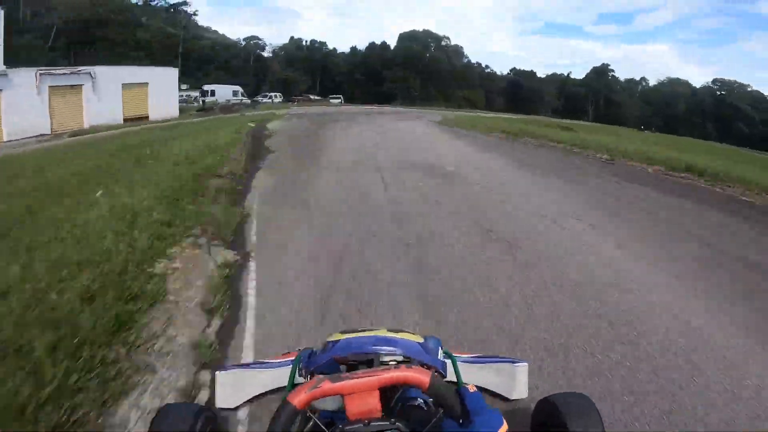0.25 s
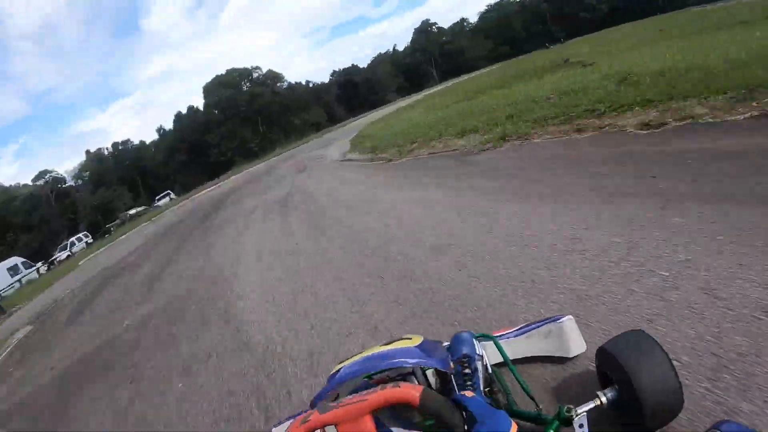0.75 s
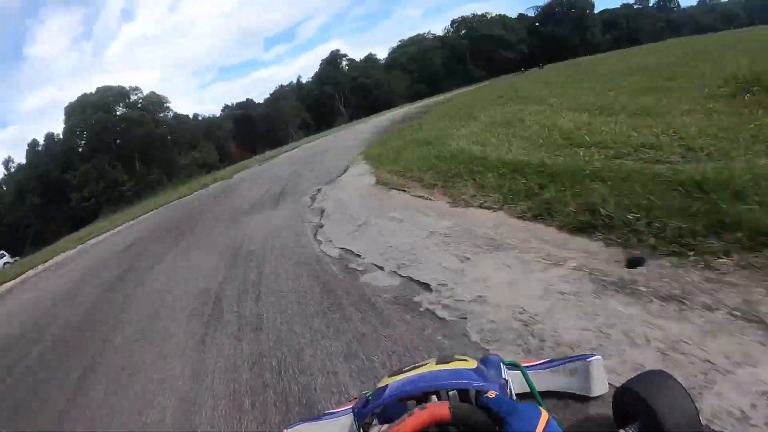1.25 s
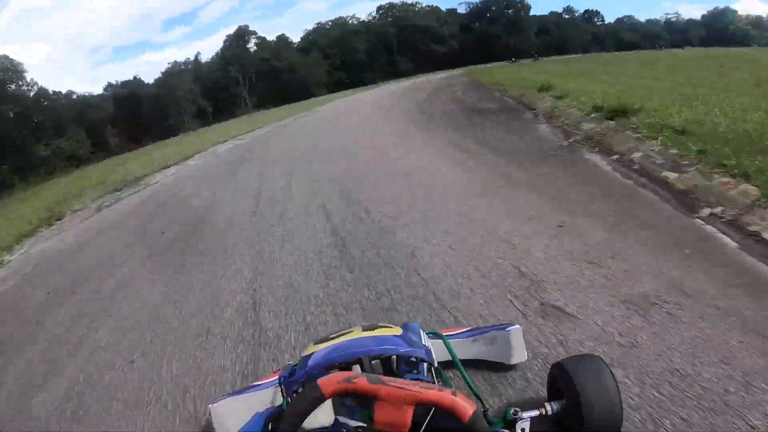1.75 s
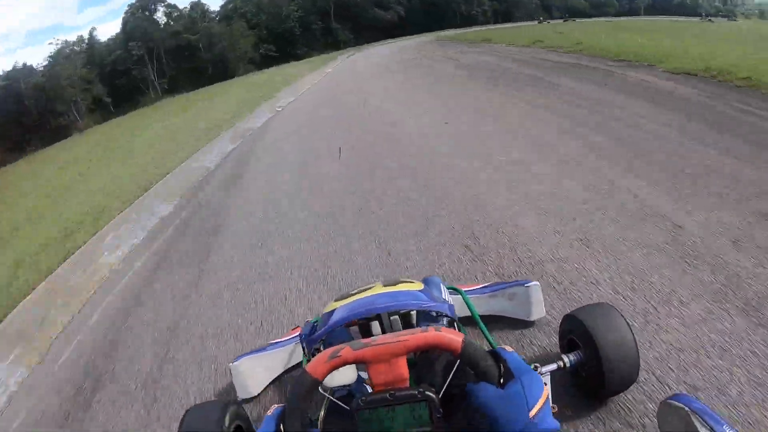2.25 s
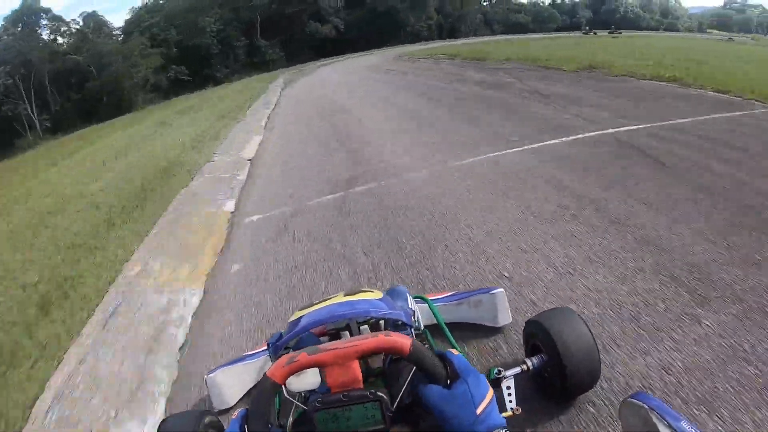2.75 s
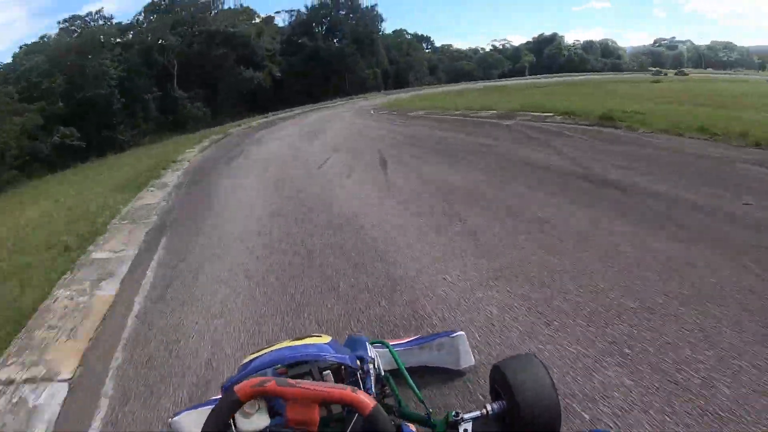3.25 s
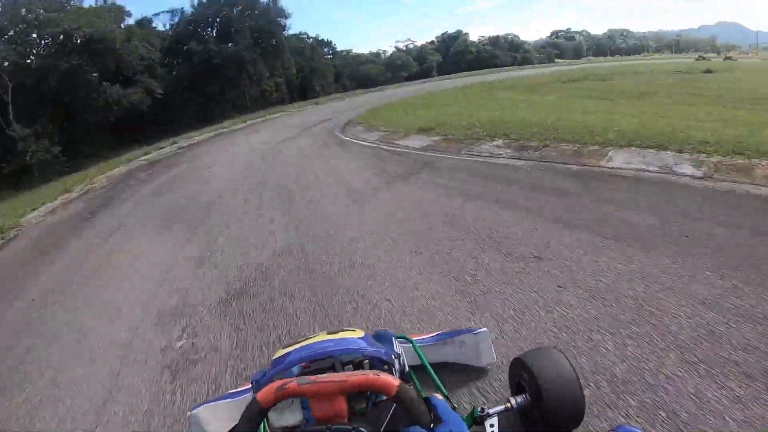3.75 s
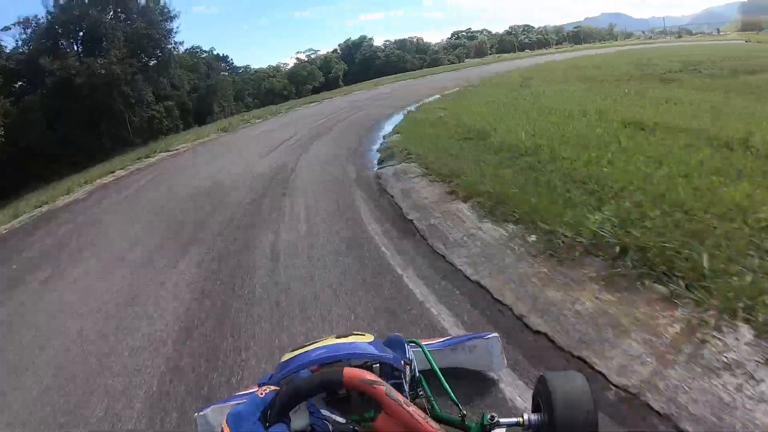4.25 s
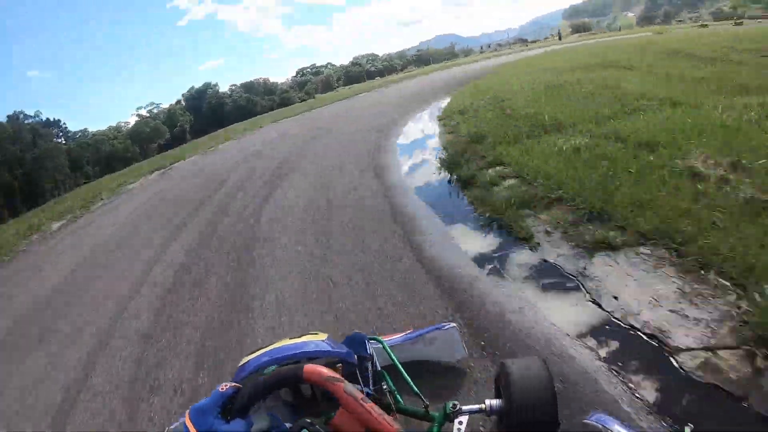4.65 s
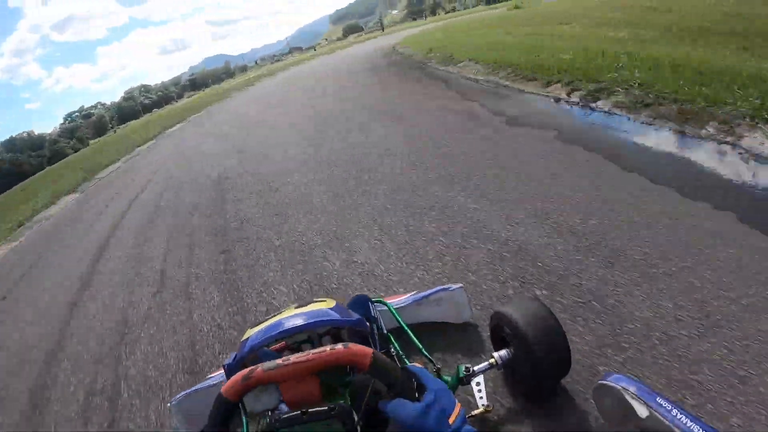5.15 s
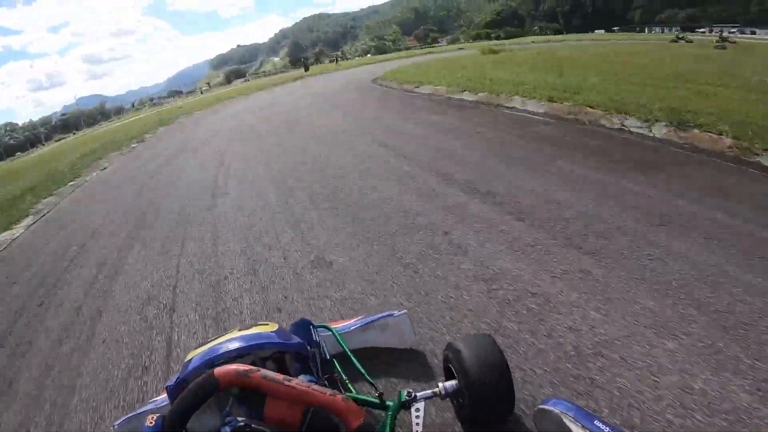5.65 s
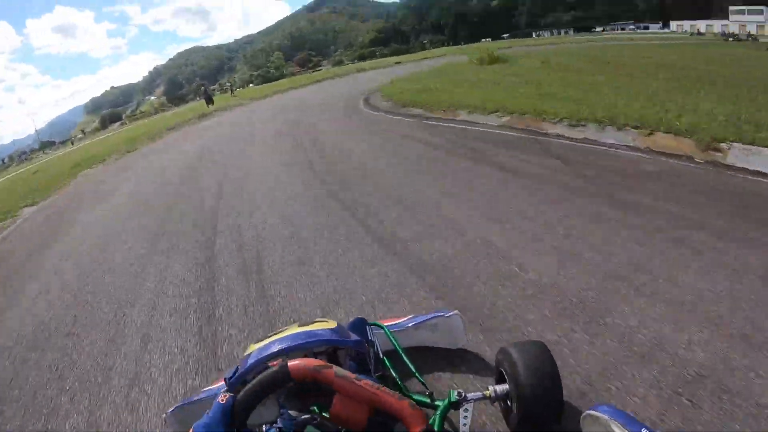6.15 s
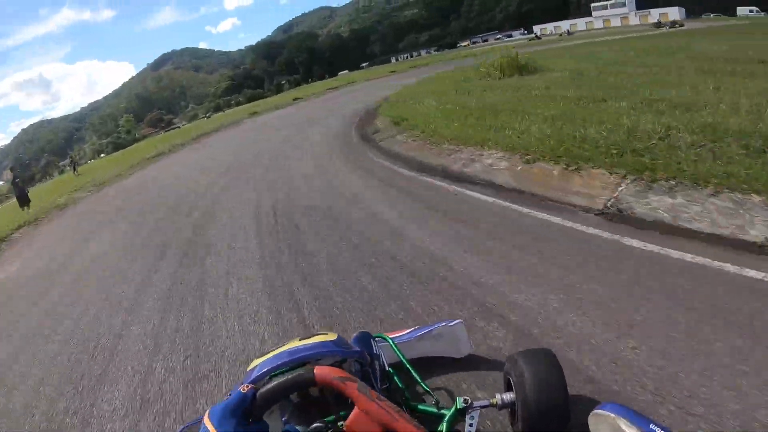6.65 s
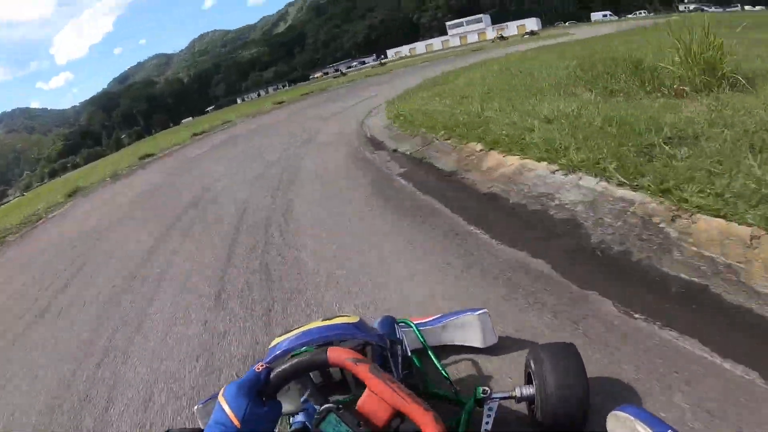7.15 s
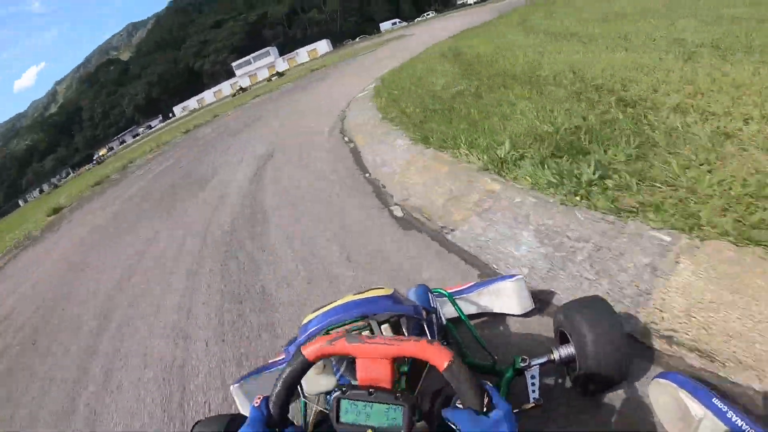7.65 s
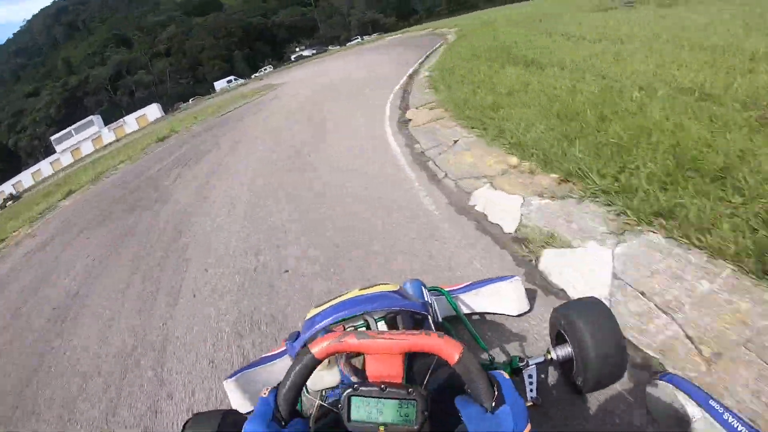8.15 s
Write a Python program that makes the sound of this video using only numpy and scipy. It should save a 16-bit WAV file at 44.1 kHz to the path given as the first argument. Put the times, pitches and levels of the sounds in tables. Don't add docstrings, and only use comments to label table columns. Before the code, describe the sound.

A helmet microphone sits close to a small single-cylinder four-stroke kart on an open track. It begins at full throttle, a fast, hard rasp with tyre roar and drumming wind, and briefly climbs in pitch before the driver lifts at about 0.5 seconds. From 0.8 to 1.1 seconds sharp backfires bang and pop, the sound ducking after the loudest, while rough ground rattles the bodywork and tyres scrub. A steady, gritty pull runs from 1.3 to 3.2 seconds. Revs then fall, with faint pops around 3.6 to 3.9 and a strong tyre scrub near 4.3. A rounder, slower pull fills 4.7 to 5.8 seconds, followed by coasting, brief throttle stabs and uneven firing as tyres slide, strongest from 7.1 to 7.7. From 7.7 the engine pulls again, low and throbbing, until the end at about 8.4.

```python
import sys
import numpy as np
from scipy import signal
from scipy.fft import rfft, irfft, next_fast_len
from scipy.io import wavfile
from scipy.ndimage import uniform_filter1d, map_coordinates

SR = 44100
rng = np.random.default_rng(int(sys.argv[2]) if len(sys.argv) > 2 else 0)


def master(y):
    cut = np.clip(np.atleast_2d(y).T, -1, 1)
    pcm = np.round(cut * 32767)
    wavfile.write(sys.argv[1], SR, pcm.astype(np.int16))


def magnitude_from_level(level_db):
    exponent = np.asarray(level_db, float) / 20
    return 10 ** exponent


N = 370881

# (time [s], firing rate [1/s])
SPEED = [(0.0, 49.24), (0.461, 51.62), (0.732, 48.2), (1.053, 41.76), (1.457, 43.81), (2.0, 42.48),
         (2.838, 43.84), (3.173, 45.71), (3.296, 43.39), (3.53, 42.72), (3.852, 39.19), (4.339, 35.61),
         (5.043, 36.09), (6.38, 34.68), (6.626, 32.89), (6.993, 32.14), (7.31, 28.9), (8.41, 26.76)]
# (start [s], end [s], throttle [0-1])
OPENINGS = [
    (-.1, .38, 0.83),
    (.47, .53, .8),
    (1.3, 3.23, 0.68),
    (4.66, 5.8, 0.5),
    (5.0, 5.8, 0.76),
    (6.26, 6.45, 0.4),
    (6.95, 7.02, 1),
    (7.72, 8.5, 0.95),
]
IDLE, PEDAL_S = 0.06, 0.08
# (start [s], end [s], scatter of firing moment [ms])
STUMBLES = [(1.13, 1.22, 1), (3.76, 3.95, .8), (5.86, 5.97, 1.5), (6.58, 6.79, 1.6), (7.26, 7.56, 1.8),
            (7.56, 8.5, .2)]
# (firing rate [1/s], ring [Hz], rise [ms], fall [ms], thump [dB])
SILENCER_SHUT = [(27.4, 180, 3.3, 8.9, -23), (32.36, 183, 4.1, 6.3, -28), (35.9, 203, 6.2, 8.3, -25),
                 (39.5, 205, 3, 5, -20.5), (43, 197.5, 3, 4.3, -19.5), (51, 190, 2.3, 4, -24)]
# (firing rate [1/s], ring [Hz], rise [ms], fall [ms], thump [dB])
SILENCER_OPEN = [(27.1, 171, 4, 11, -20.5), (28.54, 178, 4.4, 11, -21), (37.16, 197, 3.5, 8.2, -27),
                 (40, 197, 2.2, 3, -23), (51.3, 181, 2, 3, -22)]
# (time [s], level [dB], tuning [ratio to usual pitch])
RING = [(0, -21.5, 1), (.5, -20, 1), (.9, -15, .93), (1.2, -17, 1.14), (1.4, -21.5, 1), (2.3, -18, 1),
        (3.05, -21.5, 1), (3.4, -17.5, .9), (3.6, -17, 1.15), (4, -19, 1), (4.38, -12, 1.02),
        (5.3, -15.5, .98), (6.4, -12.5, 1), (6.74, -17.5, 1), (7.1, -12.5, 1.05), (7.42, -19, 1),
        (7.6, -14.5, 1), (8.41, -11.5, 1)]
# (frequency [Hz], level [dB], fall [ms], push 1 or pull -1)
PIPE = [(75.3, 3, 13, -1), (151.2, -3.5, 28, 1), (304.3, -5.5, 11, 1), (392.4, -2, 8.45, 1),
        (491, -12.5, 3.3, 1), (686, -11.5, 6.3, 1), (963, -25.5, 8.3, 1)]
# (frequency [Hz], density [dB per Hz])
CRACK = [(250, -24), (450, -11), (800, -2), (1300, -1), (1900, 0), (2600, -11), (3300, -13), (4400, -7.5),
         (6000, -11), (7500, -21), (9000, -34), (12000, -52), (15000, -62)]
# (frequency [Hz], density [dB per Hz])
BUFFET = [(15, -30), (40, -15), (100, -13), (200, -7), (350, -13.5), (600, -22), (1500, -75.5)]
BUFFET_DB, BUFFET_PER_FIRING = -39, 0.5
# (frequency [Hz], density [dB per Hz])
DRUM = [(15, -6), (40, -1.5), (80, 0), (140, -7.5), (250, -31), (500, -74.5)]
DRUM_DB, GUST_S = -31.5, 0.15
# (start [s], end [s], level [dB])
GUSTS = [(-.2, .8, 6), (.8, 1.3, 6), (2.4, 3.2, 4), (3.3, 4.1, 7), (3.8, 3.92, 9), (4.1, 4.6, 5),
         (4.9, 5.05, 2), (7.2, 7.6, 2)]
# (frequency [Hz], density [dB per Hz])
ROAR = [(200, -14), (350, -3), (600, -2), (950, 0), (1300, -2), (1900, -5), (2500, -15), (3400, -20),
        (6000, -45), (9000, -90)]
ROAR_DB, ROAR_PER_FIRING = -32.5, 0.3
ROAR_LOAD_DB, ROAR_ROUGH = 1, 0.54
# (start [s], end [s], shaking [dB])
ROUGH = [(0, .15, 5.5), (.5, .8, 4), (.97, 1.12, 7.5), (1.17, 1.4, 8), (4.29, 4.37, 0)]
ROUGH_S = 0.031
# (frequency [Hz], width [Hz], level [dB])
SCRUB = [(1626, 550, 0)]
# (start [s], end [s], scrub over rolling [dB])
SLIDES = [(0, .32, -6.5), (.62, .72, 8), (1.05, 1.75, 11.5), (1.26, 1.32, 18), (3.15, 3.7, 9),
          (4.05, 4.5, 9.5), (4.28, 4.37, 19), (4.73, 4.85, 10), (5.7, 6.6, 5), (6.6, 7.1, 9.5),
          (7.1, 7.68, 12)]
ROLLING_DB, SLIDE_S = -43.5, 0.06
# (frequency [Hz], density [dB per Hz])
HISS = [(2500, -34), (3700, -10), (4700, 5.5), (6300, 1.5), (7200, -12.5), (8500, -16.5), (10500, -33.5),
        (13500, -52.5)]
# (time [s], hiss level [dB])
AIR = [(0, -43.5), (.35, -42), (.6, -35.5), (.75, -40), (.88, -35.5), (1.05, -42), (1.4, -34.5), (2.1, -35),
       (2.3, -33), (2.6, -36), (3.5, -36), (4.1, -43), (4.7, -42.5), (5.3, -37.5), (6.05, -42.5),
       (6.4, -41.5), (7.3, -44.5), (7.8, -37.5)]
# (frequency [Hz], width [Hz], level [dB])
RATTLE = [(860, 360, 0)]
RATTLE_DB, RATTLE_ROUGH = -54, 2.84
# (time [s], peak [dB], gain dip [dB])
POPS = [
    (0.777, -12.5, 8),
    (0.858, -23.5, -5),
    (0.931, -12.5, 5.5),
    (1.006, -27.5, -6.5),
    (1.118, -17.5, 11),
    (3.611, -25.5, -6),
    (3.658, -24, -5),
    (3.87, -24.5, -3),
]


def unit(x):
    return x / np.sqrt(np.mean(x ** 2) + 1e-20)


def curves(rows, s):
    at, *columns = np.transpose(rows)
    return [np.interp(s, at, column) for column in columns]


def spells(rows, s, edge_s):
    start, end, height = np.transpose(rows)[..., None]
    inside = np.minimum(s - start, end - s)
    return (height * np.clip(inside / edge_s + 0.5, 0, 1)).max(axis=0)


def wobble(rate):
    knots = rng.standard_normal(int(N * rate / SR) + 4)
    return map_coordinates(knots, [np.arange(N) * rate / SR])


def filtered(x, response):
    m = next_fast_len(N + 8192)
    return irfft(rfft(x, m) * response(np.fft.rfftfreq(m, 1 / SR)), m)[:N]


def colour(points):
    hz, db = np.transpose(points)
    return lambda f: magnitude_from_level(np.interp(np.log(f + 1), np.log(hz), db, right=-120))


def modes(table):
    def response(f):
        total = 0
        for k, (centre, width, db) in enumerate(table):
            damping = 1j * f * width
            total = total + (-1) ** k * magnitude_from_level(db) * damping / (centre * centre - f * f + damping)
        return total
    return response


def rush(response, patchy_db):
    z = signal.stft(rng.standard_normal(N + 512), nperseg=512)[2]
    field = uniform_filter1d(rng.standard_normal(z.shape), size=6, axis=0)
    field = uniform_filter1d(field, size=10, axis=1)
    noise = signal.istft(z * magnitude_from_level(patchy_db * unit(field)), nperseg=512)[1][:N]
    return unit(filtered(noise, response))


def placed(s, shapes):
    at = np.round(s * SR).astype(int)[:, None] + np.arange(shapes.shape[1])
    at = np.where((at < 0) | (at > N), N, at)
    return np.bincount(at.ravel(), shapes.ravel(), N + 1)[:N]


def swell(t, rise, fall):
    return (1 - np.exp(-(t / rise) ** 2)) * np.exp(-t / fall)


def swing(t, hz, rise, fall):
    shape = np.where(t < 0, np.exp(-(1000 * t / rise) ** 2 / 2), np.exp(-1000 * t / fall))
    return -shape * np.cos(2 * np.pi * hz * t)


def pedal(s):
    return np.maximum(spells(OPENINGS, s, PEDAL_S), IDLE)


def pipe_modes(t, hz, rate):
    since = t + 0.0026
    steep = np.clip(rate / 43, 0, 1)
    warmth = np.minimum(hz / 195, 1)
    total = 0
    for mode_hz, db, fall_ms, way in PIPE:
        reach = steep ** min(abs(mode_hz / 150 - 1.8), 1.4)
        total = total - np.sign(way) * magnitude_from_level(db) * reach * swing(since, mode_hz * warmth, 0.68, fall_ms)
    return total


def blow_down(t, count):
    since = np.maximum(t + 0.0042, 0)
    envelope = 0.8 * swell(since, 0.0007, 0.0018) + 0.04 * swell(since, 0.002, 0.007)
    spray = rng.standard_normal((count, len(t))) * envelope
    shock = 1.6 * (t > -0.0036) * np.exp(-(t + 0.0036) / 0.00005)
    return spray + shock


def engine():
    clock = np.arange(N) / SR
    cycles = np.cumsum(curves(SPEED, clock)[0]) / SR - 0.24
    count = int(cycles[-1]) + 1
    timing, pitch, ring_luck, thump_luck, crack_luck = rng.standard_normal((5, count, 1))
    s = np.interp(np.arange(count), cycles, clock)
    rate, throttle = curves(SPEED, s)[0], pedal(s)[:, None]
    ring_db, tuning = (column[:, None] for column in curves(RING, s))
    load = np.clip(1.4 * throttle - 0.15, 0, 1)
    shut, wide = curves(SILENCER_SHUT, rate), curves(SILENCER_OPEN, rate)
    hz, rise, fall, thump_db = (a[:, None] * (1 - load) + b[:, None] * load for a, b in zip(shut, wide))

    scatter = 0.00024 - 0.00012 * throttle[:, 0] + spells(STUMBLES, s, PEDAL_S) / 1000
    lead = 0.016
    s = s + scatter * timing[:, 0] - 0.0012 - 0.0004 * (fall - rise)[:, 0] - lead
    t = np.arange(SR // 16) / SR - lead

    size = magnitude_from_level(ring_db + 0.75 * ring_luck) * np.sqrt(20 / (rise + fall))
    hz = hz * (1 + (0.007 + 0.02 * spells(STUMBLES, s + lead, PEDAL_S)[:, None]) * pitch)
    ring = magnitude_from_level(7.5) * size * swing(t, tuning * hz, rise, fall)
    thump = (0.45 + throttle) * magnitude_from_level(thump_db + 6 + thump_luck) * pipe_modes(t, hz, rate[:, None])
    crack = throttle * magnitude_from_level(1.6 * crack_luck - 2.6) * blow_down(t, count)
    return placed(s, ring + thump) + filtered(placed(s, crack), colour(CRACK))


def wind(faster):
    lumps = magnitude_from_level(1.5 * wobble(12))
    level = magnitude_from_level(BUFFET_DB + BUFFET_PER_FIRING * faster + 12.5)
    return level * lumps * rush(colour(BUFFET), patchy_db=1)


def gust_drum(clock):
    level_db = DRUM_DB + spells(GUSTS, clock, GUST_S) + 2 * wobble(15)
    return magnitude_from_level(level_db) * rush(colour(DRUM), patchy_db=1)


def tyre_roar(clock, faster, shake_db, bumps):
    level_db = ROAR_DB + ROAR_PER_FIRING * faster + ROAR_LOAD_DB * pedal(clock) + ROAR_ROUGH * shake_db
    return magnitude_from_level(level_db - 4 + bumps) * rush(colour(ROAR), patchy_db=2)


def tyre_scrub(clock):
    level_db = ROLLING_DB + spells(SLIDES, clock, SLIDE_S) - 3 + 1.8 * wobble(60)
    return magnitude_from_level(level_db) * rush(lambda f: modes(SCRUB)(f) ** 2, patchy_db=0.5)


def chain_and_air_hiss(clock, bumps):
    level_db = curves(AIR, clock)[0] + 1.2 * bumps + 1.42 * wobble(90)
    return magnitude_from_level(level_db) * rush(colour(HISS), patchy_db=1.5)


def bodywork_rattle(shake_db):
    level_db = RATTLE_DB + RATTLE_ROUGH * shake_db + 2.2 * wobble(45)
    return magnitude_from_level(level_db) * rush(lambda f: modes(RATTLE)(f) ** 2, patchy_db=2)


def road():
    clock = np.arange(N) / SR
    faster = curves(SPEED, clock)[0] - 36
    shake_db = spells(ROUGH, clock, ROUGH_S)
    bumps = wobble(11)
    air = wind(faster) + gust_drum(clock) + chain_and_air_hiss(clock, bumps)
    tyres = tyre_roar(clock, faster, shake_db, bumps) + tyre_scrub(clock)
    return air + tyres + bodywork_rattle(shake_db)


def backfires():
    s, db, _ = np.transpose(POPS)
    t = np.arange(SR // 40) / SR
    noise = rng.standard_normal((len(s), len(t)))
    bang = np.exp(-t / 0.0018) * (noise + 0.5 * np.sin(2 * np.pi * 1750 * t))
    return filtered(placed(s, magnitude_from_level(db[:, None] + 11) * bang), colour(CRACK))


def scene():
    return (engine() + road() + backfires())[None]


def top_cut(x):
    return signal.sosfilt(signal.butter(12, 15700, fs=SR, output="sos"), x)


def record(dry):
    s, _, dip_db = np.transpose(POPS)
    t = np.arange(SR // 4) / SR
    dips = np.clip(dip_db, 0, 8)[:, None] * swell(t, 0.004, 0.04)
    ducked = dry * magnitude_from_level(-placed(s, dips))
    limited = ducked / (1 + np.abs(ducked / 0.75) ** 5) ** (1 / 5)
    mix = filtered(limited[0], lambda f: 1 / (1 + (f / 11000) ** 4))[None]
    return top_cut(mix)


dry = scene()
out = record(dry)
master(out)
```